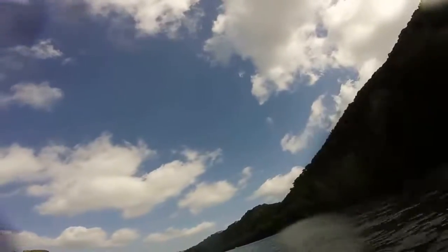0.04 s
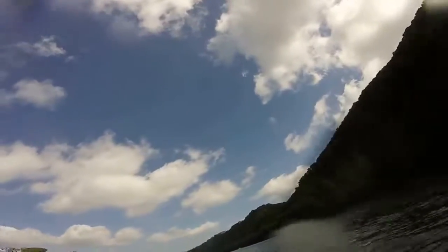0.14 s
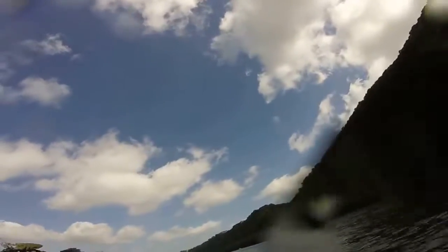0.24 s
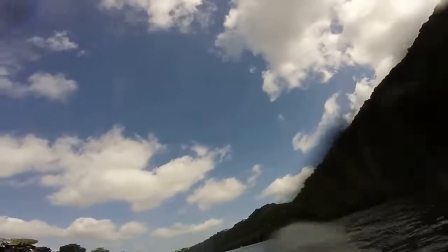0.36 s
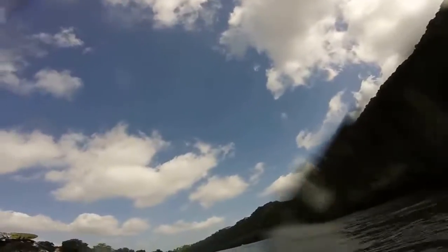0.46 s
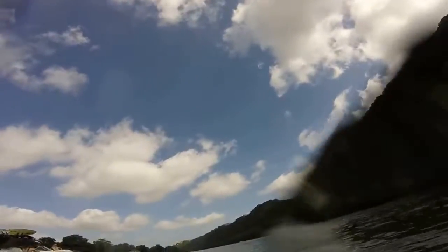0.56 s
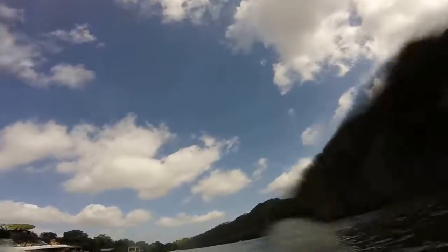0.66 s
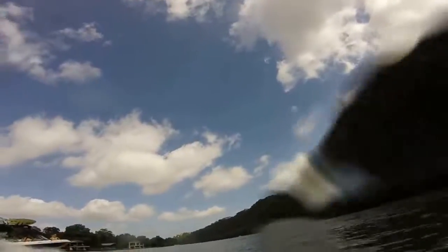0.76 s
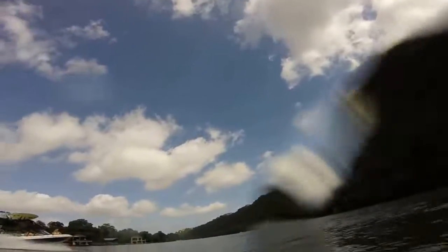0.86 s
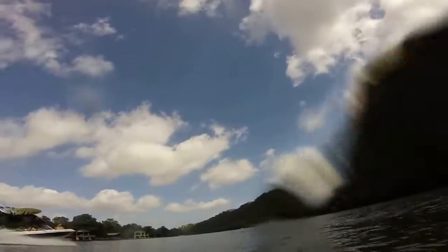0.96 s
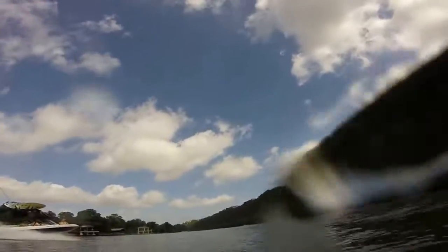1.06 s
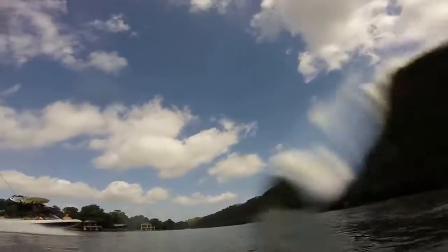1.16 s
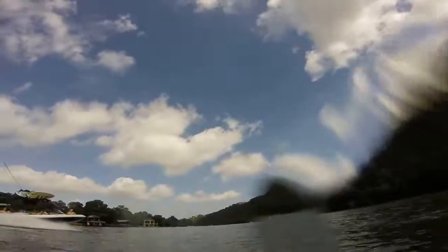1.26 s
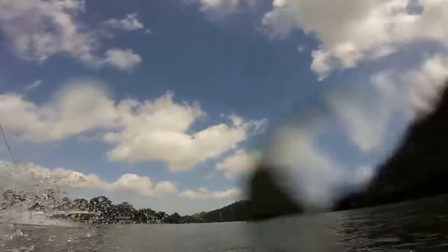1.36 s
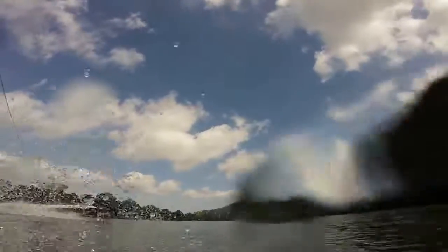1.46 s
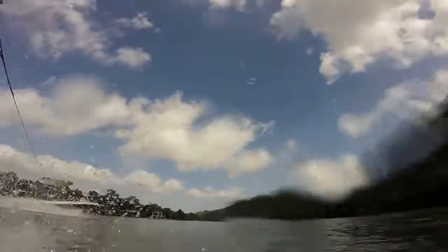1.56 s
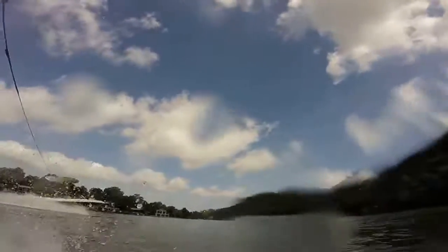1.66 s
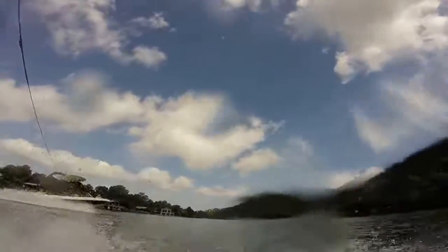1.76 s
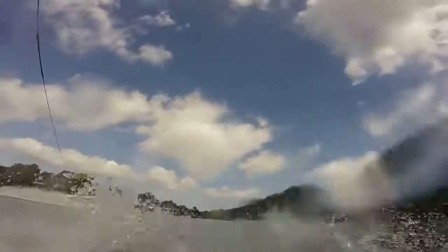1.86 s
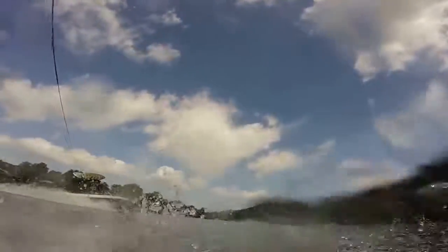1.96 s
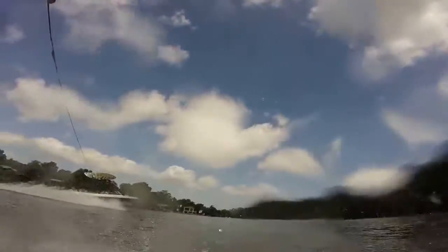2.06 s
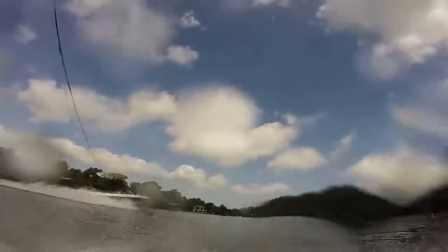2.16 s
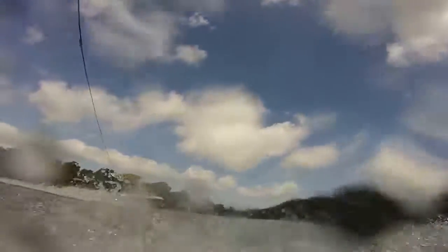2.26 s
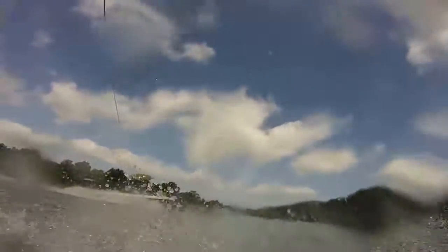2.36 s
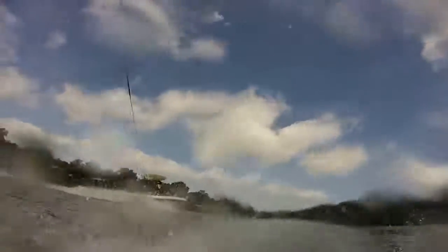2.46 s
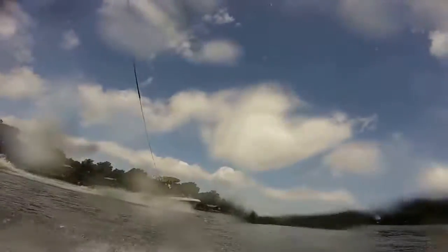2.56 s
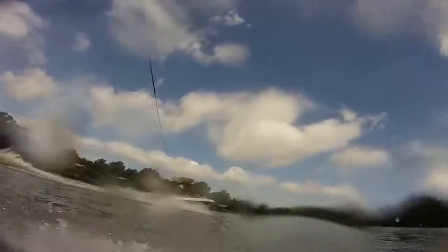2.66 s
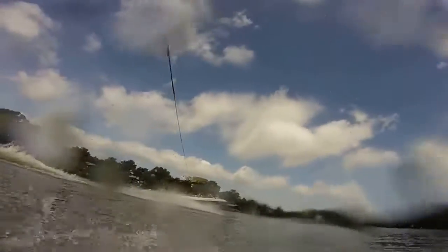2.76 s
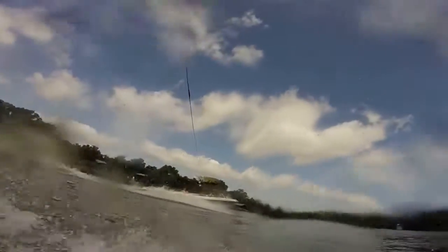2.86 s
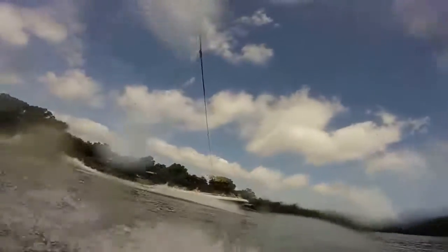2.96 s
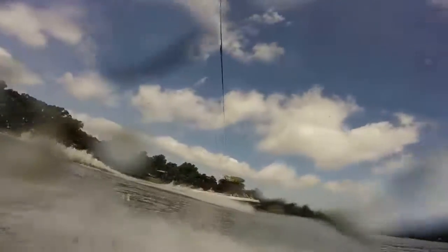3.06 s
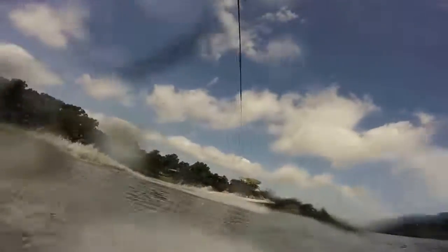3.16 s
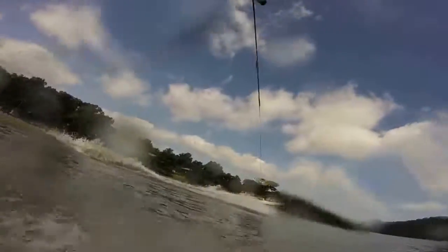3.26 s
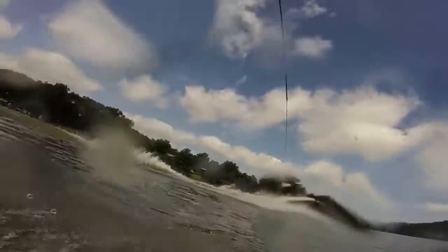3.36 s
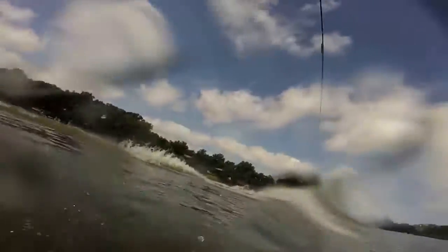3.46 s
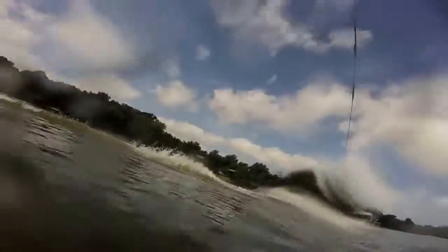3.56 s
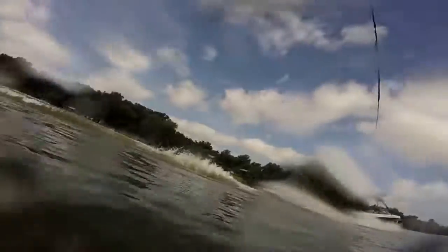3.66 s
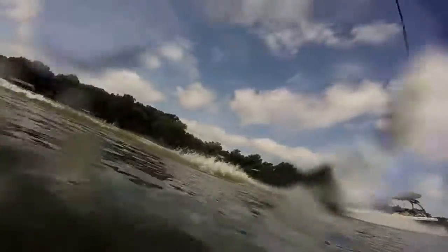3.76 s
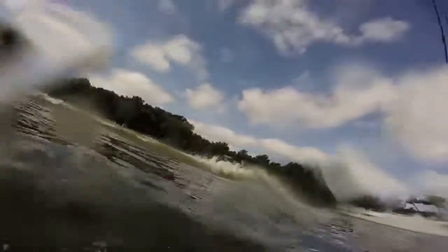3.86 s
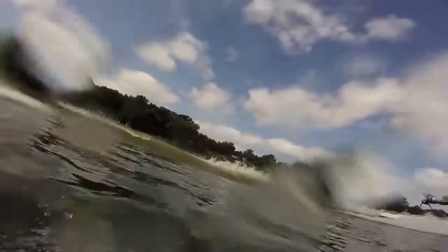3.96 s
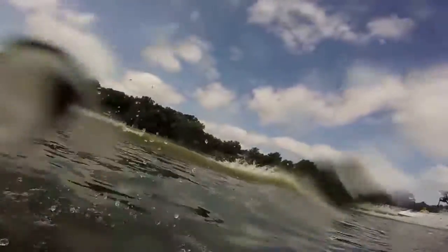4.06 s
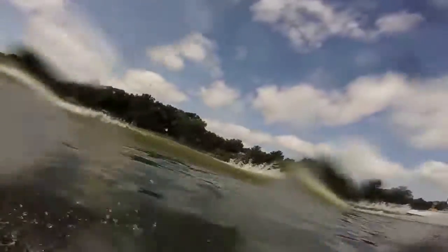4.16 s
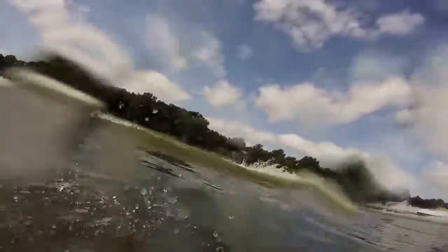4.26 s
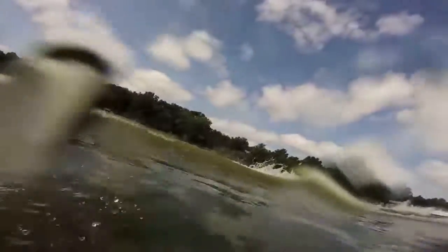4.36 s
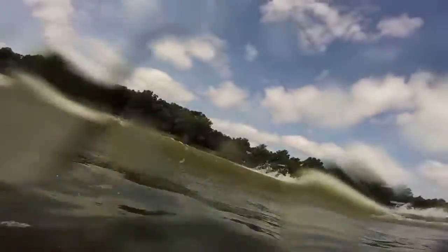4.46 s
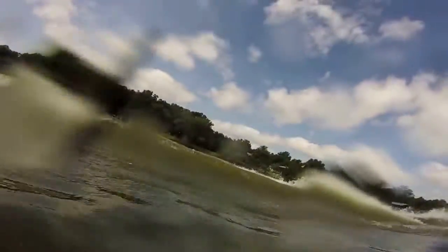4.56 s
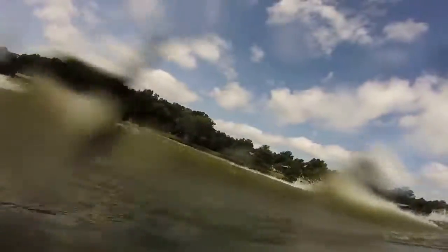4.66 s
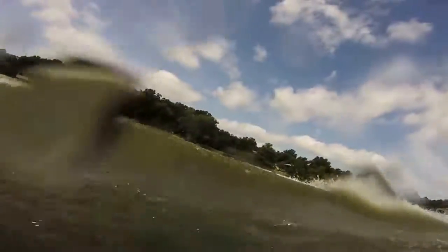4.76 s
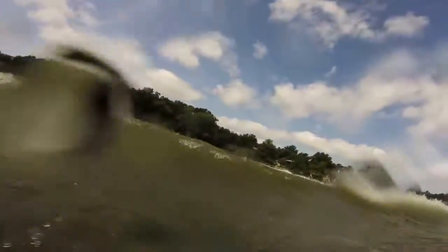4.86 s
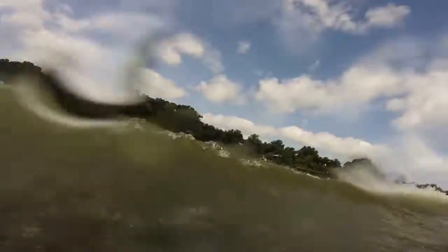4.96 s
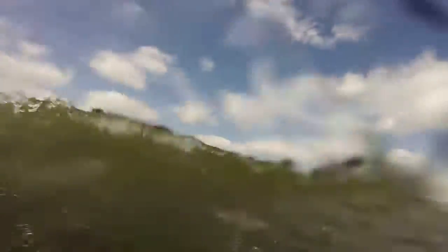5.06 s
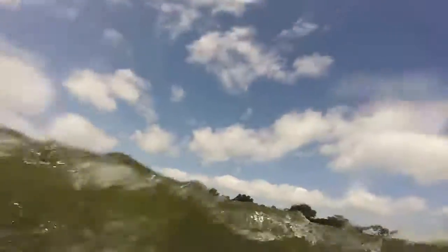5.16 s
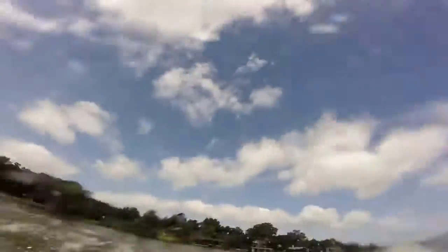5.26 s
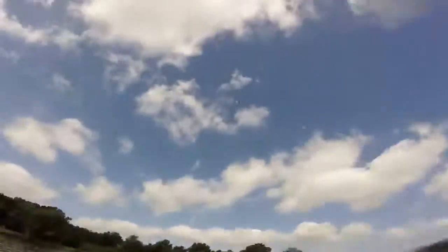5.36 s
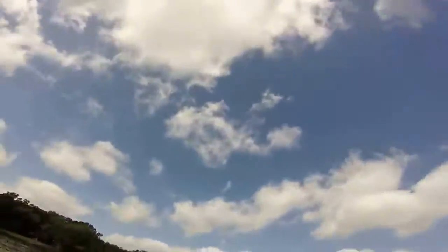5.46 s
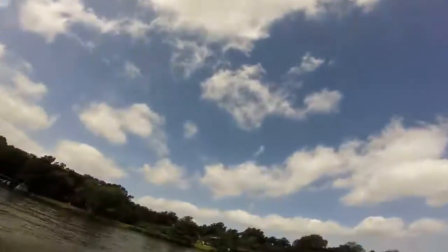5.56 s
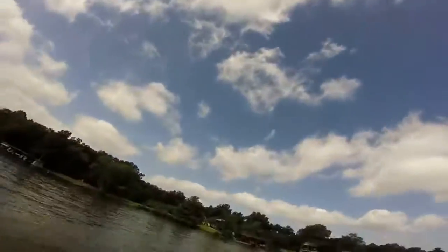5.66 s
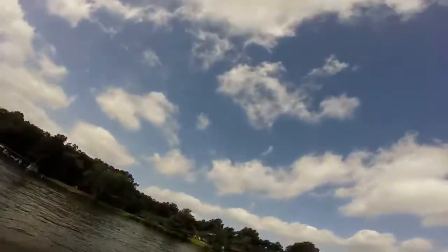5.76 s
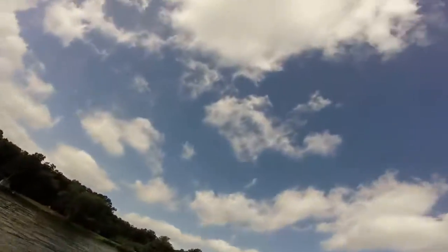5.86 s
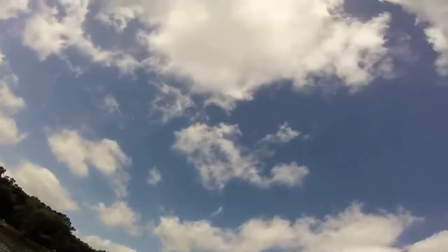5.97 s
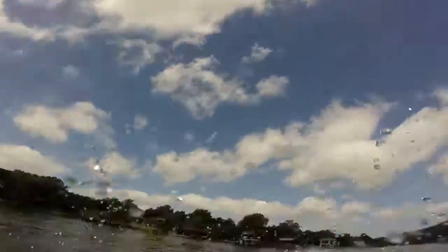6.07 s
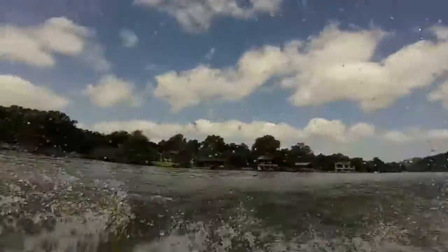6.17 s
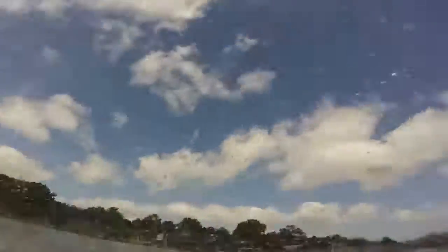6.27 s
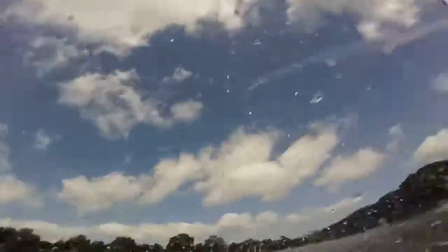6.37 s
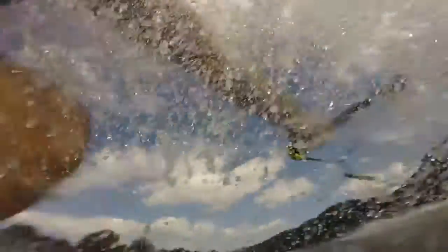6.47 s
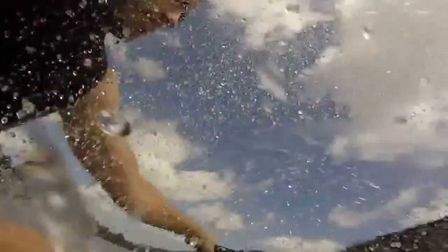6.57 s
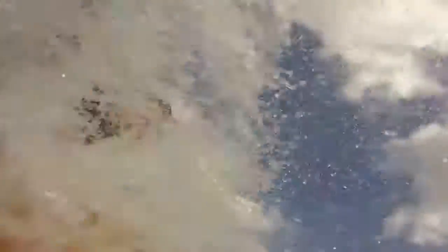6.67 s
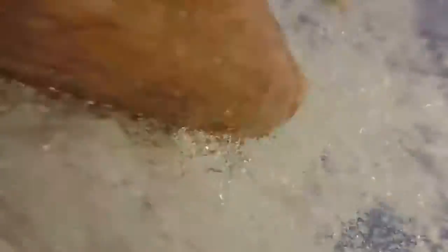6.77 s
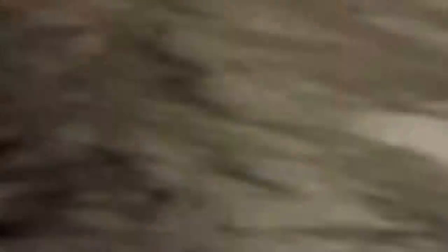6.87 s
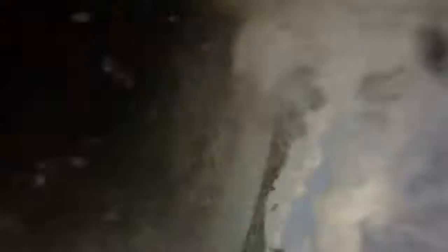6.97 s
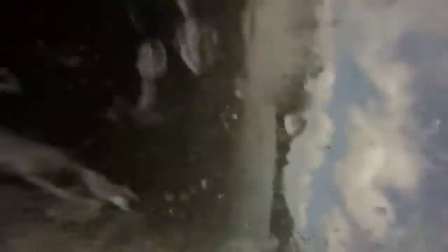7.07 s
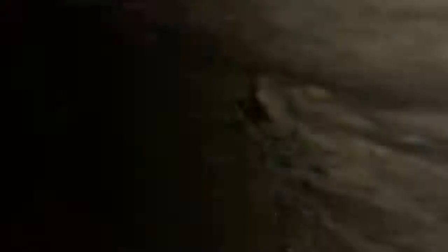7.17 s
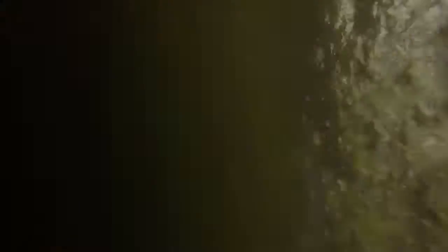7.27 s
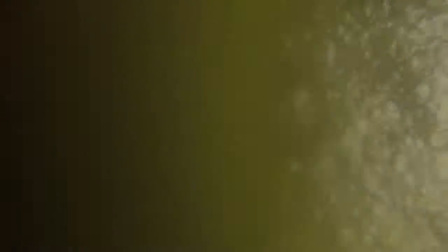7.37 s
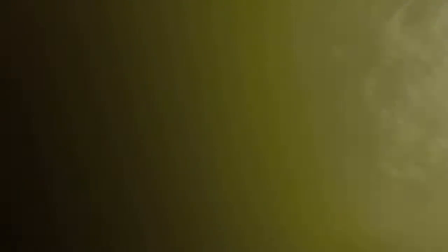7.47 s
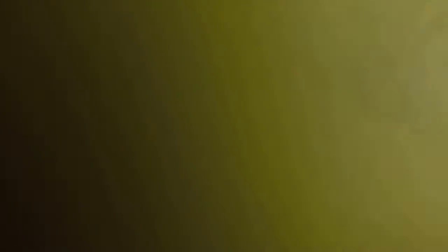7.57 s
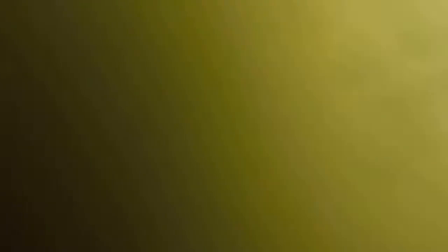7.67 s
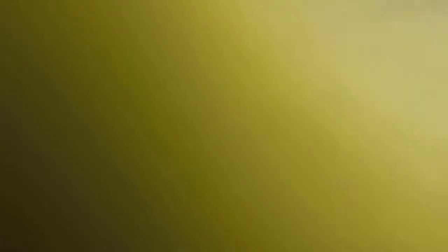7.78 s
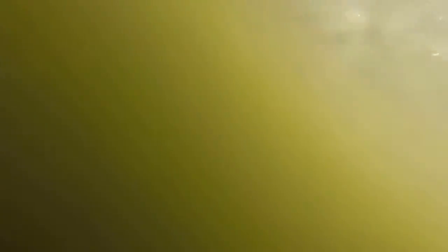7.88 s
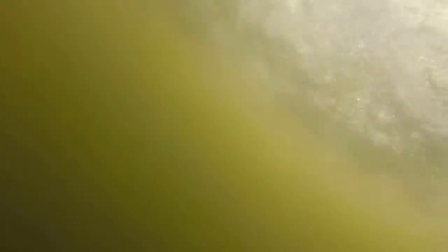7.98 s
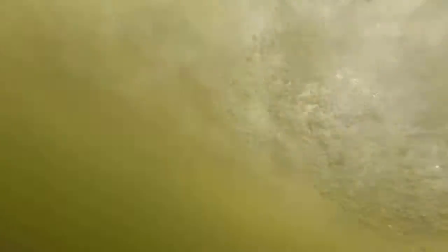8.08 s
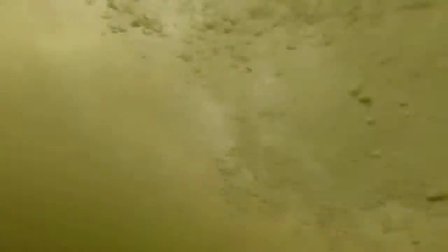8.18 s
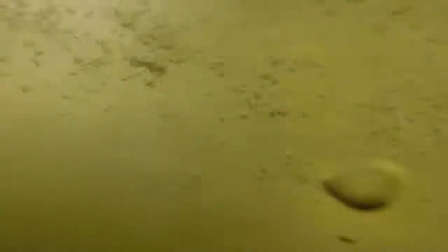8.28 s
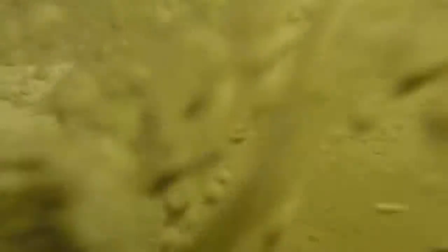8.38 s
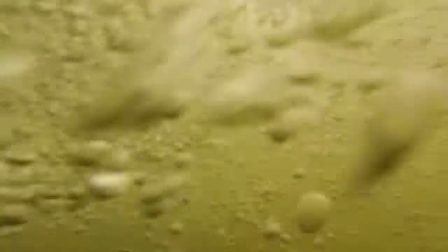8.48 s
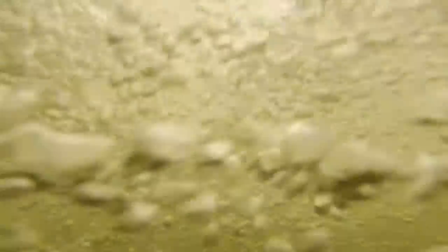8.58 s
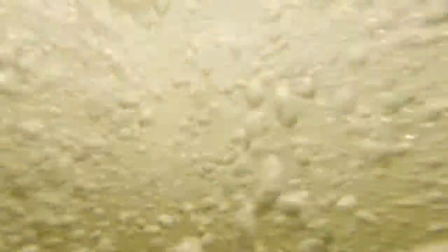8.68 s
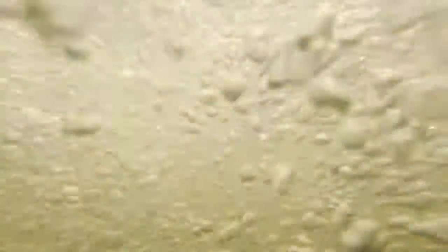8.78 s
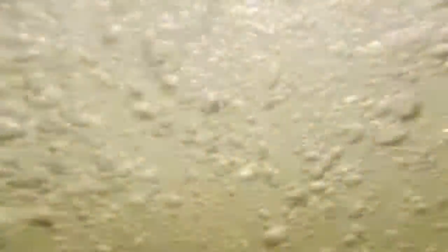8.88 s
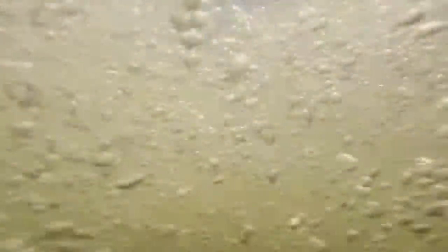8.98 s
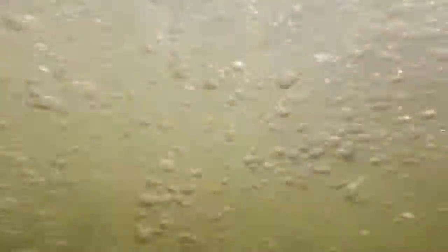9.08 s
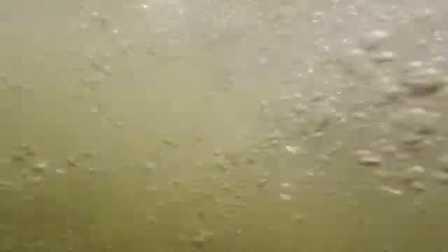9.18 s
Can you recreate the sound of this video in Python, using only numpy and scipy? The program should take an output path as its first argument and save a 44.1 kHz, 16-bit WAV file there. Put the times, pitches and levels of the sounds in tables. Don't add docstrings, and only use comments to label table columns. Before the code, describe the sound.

Wakeboard drums and flexes over choppy water with spray rattling a sealed plastic housing, then a splashing fall and muffled underwater gurgling.

```python
import sys
import numpy as np
from scipy import signal
from scipy.fft import rfft, irfft, next_fast_len
from scipy.io import wavfile
from scipy.ndimage import uniform_filter1d, map_coordinates

SR = 44100
rng = np.random.default_rng(int(sys.argv[2]) if len(sys.argv) > 2 else 0)


def undo_db(level):
    steps = np.asarray(level, float) / 20
    return 10 ** steps


def to_wav(sig):
    pcm = np.clip(np.atleast_2d(sig), -1, 1) * 32767
    pcm = np.round(pcm).astype(np.int16)
    wavfile.write(sys.argv[1], SR, pcm.T)


N = 407043


def unit(x):
    return x / np.sqrt(np.mean(x ** 2) + 1e-20)


def curves(rows):
    s, *columns = np.transpose(rows)
    t = np.arange(N) / SR
    fade = np.clip(1 + np.minimum(t - s[0], s[-1] - t) / 0.25, 0, 1)
    return [np.interp(t, s, column) for column in columns] + [fade]


def held(rows, blend_s):
    out = np.zeros(N)
    for s, value, length_s in rows:
        out[max(int(s * SR), 0):int((s + length_s) * SR)] += value
    return uniform_filter1d(out, int(blend_s * SR) + 1)


def wobble(rate):
    knots = rng.standard_normal(int(N * rate / SR) + 4)
    return map_coordinates(knots, [np.arange(N) * rate / SR])


def shaped(x, spectrum, modes=()):
    size, short = 2 * next_fast_len(N // 2 + SR // 4), 2 ** 14
    hz, db = np.transpose(spectrum)
    log_hz = np.log(np.fft.rfftfreq(short, 1 / SR) + 1)
    cepstrum = irfft(np.log(undo_db(np.interp(log_hz, np.log(hz), db)) + 1e-6), short)
    cepstrum[1:short // 2] *= 2
    cepstrum[short // 2 + 1:] = 0
    gain = rfft(irfft(np.exp(rfft(cepstrum)), short), size)
    f = np.fft.rfftfreq(size, 1 / SR)
    if len(modes):
        response = 0
        for k, (center, width, level_db) in enumerate(modes):
            band = 1j * f * width / (center * center - f * f + 1j * f * width)
            response = response + (-1) ** k * undo_db(level_db) * band
        gain = gain * response
    return irfft(rfft(x, size) * gain, size)[:N]


def evened(x, spectrum):
    return shaped(x, spectrum) / np.std(shaped(rng.standard_normal(N), spectrum))


def pelt(rate, spread_db, share):
    size_db = np.minimum(spread_db * rng.exponential(size=N), 9)
    hits = (rng.random(N) < rate / SR) * undo_db(size_db) * rng.standard_normal(N)
    share = np.clip(share, 0, 1)
    return np.sqrt(share) * unit(hits) + np.sqrt(1 - share) * rng.standard_normal(N)


def rings(rows, rise, attack):
    out, t = np.zeros(N + SR), np.arange(SR // 8) / SR
    for s, db, hz, t60 in rows:
        n = int(min(t60 * 1.2 * SR, len(t)))
        u = t[:n]
        tone = np.sin(2 * np.pi * hz * u * (1 + rise * u / t60))
        envelope = undo_db(db - 60 * u / t60) * (1 - np.exp(-u * hz / attack))
        out[int(s * SR):][:n] += envelope * tone
    return out[:N]


def spatter(rows, t60, width):
    out, t = np.zeros(N + SR), np.arange(SR // 50) / SR
    noise = rng.standard_normal((len(rows), 2, len(t)))
    for (s, db, hz), pair in zip(rows, noise):
        span = int(SR / hz / width) + 1
        a, b = unit(uniform_filter1d(uniform_filter1d(pair, span), span))
        burst = a * np.sin(2 * np.pi * hz * t) + b * np.cos(2 * np.pi * hz * t)
        envelope = undo_db(db - 60 * t / t60) * (1 - np.exp(-t / 0.0003))
        out[max(int(s * SR), 0):][:len(t)] += envelope * burst
    return out[:N]


# pitch_hz, level_db
STIFF = [(20, 0), (450, -8), (600, -14), (1500, -18.5), (4000, -120)]
# pitch_hz, width_hz, level_db
DRUM = [(91.9, 19.7, -2.5), (189, 25.1, 0.5), (217.6, 53.5, -7), (390, 96, -14.5)]


def board_drum(chop, patter):
    blows = undo_db(chop + 2.34 * patter) * pelt(rate=150, spread_db=1.5, share=0.24)
    return unit(shaped(blows, STIFF, DRUM))


# pitch_hz, width_hz, level_db
FLEX = [(31.3, 14.6, -0.5), (69, 36.7, -11)]


def board_flex():
    return unit(shaped(pelt(rate=45, spread_db=4.5, share=0.42), STIFF, FLEX))


# pitch_hz, density_db_per_hz
SEAL = [(300, -9.5), (700, -7), (1100, 2.5), (3200, -2.5), (3700, -15.5), (10000, -34), (15000, -33.5)]
# pitch_hz, width_hz, level_db
HOUSING = [(1324, 300, 3), (1724, 360, -10), (2407, 86, -4), (3040, 176, -12.5), (4070, 320, -13.5),
           (5030, 340, -58.5), (6140, 420, -12), (7140, 690, -50), (8900, 450, -60.5)]


def spray_on_housing(chop, patter):
    gusts = undo_db(0.2 * chop + 2.33 * patter + 2.1 * wobble(110))
    return unit(shaped(gusts * pelt(rate=900, spread_db=-1, share=0.49), SEAL, HOUSING))


# pitch_hz, width_hz, level_db
WALLS = [(1905, 186, 2), (2563, 126, 3), (3120, 310, -2), (4160, 220, -15), (5040, 79, -4),
         (5940, 220, -2.5), (7000, 200, -3.5), (8950, 300, -4.5)]


def thin_walls(chop, patter):
    gusts = undo_db(0.67 * chop + 2.5 * patter + 3 * wobble(90))
    return unit(shaped(gusts * pelt(rate=900, spread_db=6, share=0.45), SEAL, WALLS))


# pitch_hz, density_db_per_hz
FIZZ = [(1180, -10), (2000, -2), (2280, -9), (3080, -3.5), (4020, -15), (5030, -16.5), (5620, -19),
        (8210, -20.5), (14500, -36.5), (15700, -49.5)]
# pitch_hz, density_db_per_hz
CRACK = [(1000, -12), (2000, 2), (3100, 5), (4500, -7.5), (7000, -9.5), (9500, -21), (12000, -47),
         (15700, -56)]


def port_fizz(chop, patter, wet_db):
    fizz = unit(shaped(undo_db(0.34 * chop + 0.64 * patter) * pelt(rate=1700, spread_db=22.5, share=0.43), FIZZ))
    droplets = unit(shaped(pelt(rate=290, spread_db=7.0, share=1) * undo_db(5.4 * wobble(25)), CRACK))
    return fizz + undo_db(-17 + 0.5 * wet_db) * droplets


# start_s, peak_db, pitch_hz
SLAPS = [(1.013, -11, 61.9), (2.18, -7, 59), (2.355, -5.5, 177), (3.464, 2, 35), (4.133, -5, 90),
         (5.013, -6, 189), (5.044, 5, 75), (5.201, -1.5, 71.4), (6.138, 6.5, 156), (6.142, -7, 310),
         (6.295, -7.5, 280), (7.249, -13, 520), (4.123, -17, 387), (6.287, 0, 64.6), (6.308, 6, 75),
         (6.515, -8.5, 130), (6.555, -3, 138), (6.627, -5, 148), (6.914, 0.5, 123), (7.08, -3.5, 77)]


def wave_slaps():
    return rings([(s, db, hz, 0.028) for s, db, hz in SLAPS], rise=-0.088, attack=0.084)


# time_s, contact_db, spray_over_contact_db
RIDE = [(0, -20, -7), (.95, -19, -8.5), (1.3, -23.5, -10), (2.06, -31.5, -13), (2.93, -23, -13),
        (3.3, -20, -7), (3.75, -27.5, -3.5), (4.05, -32, -5), (4.95, -19, -5.5), (5.48, -28, -12),
        (5.62, -35.5, -11.5), (5.9, -57.5, -4.5), (6.4, -29.5, -10.5), (6.55, -24, -13.5),
        (7.15, -28.5, -10.5), (7.42, -32, 8), (7.66, -32, -9.5), (7.9, -33.5, -40)]
# start_s, flex_db, port_fizz_db, wall_rattle_db
STAGES = [(0, -16.5, 2, -16), (2.56, -16, 6, -13), (3.55, -24, 0, -5.5), (4.15, -18.5, 0, -4),
          (5.06, -16, -3.5, -32), (5.66, -36.5, -2.5, -1.5), (6.14, -24.5, -2, -5.5), (6.44, -22, 8.5, 3.5),
          (7.2, -29, 14, -4), (7.65, -28, 5, -6), (7.76, -37.5, 0, -13.5)]
# start_s,
# change_db, length_s
CRESTS = [(.22, 5, 0.089), (.42, -3.5, 0.2), (.9, 2, 0.015), (2.72, 4.5, 0.13), (1.27, 5, 0.013),
          (1.44, 10.5, 0.038), (1.51, 9, 0.048), (1.605, 8.5, 0.02), (1.9, 9, 0.13), (2.04, -5.5, 0.063),
          (2.18, 10.5, 0.023), (2.34, 7.5, 0.092), (3.38, 4, 0.1), (3.58, 4, 0.051), (3.84, 5, 0.11),
          (4.05, -8.5, 0.045), (4.11, 5, 0.091), (4.34, 6, 0.087), (5.0, 7, 0.042), (5.22, -12, 0.058),
          (5.9, 6, 0.14), (5.95, 6, 0.062), (6.215, -5, 0.038), (6.28, 17.5, 0.026), (6.34, -9.5, 0.087),
          (7.04, -2.5, 0.034), (3.947, -4, 0.024), (5.67, -9, 0.13), (7.23, 2.5, 0.084)]


def board():
    contact_db, over_db, fade = curves(RIDE)
    starts, *levels = np.transpose(STAGES)
    lengths = np.diff(starts, append=N / SR)
    flex_db, wet_db, walls_db = (held(zip(starts, v, lengths), blend_s=0.012) for v in levels)
    crest_db = held(CRESTS, blend_s=0.0081)
    drum_db = contact_db + 1.02 * crest_db
    spray_db = contact_db + over_db + crest_db
    fizz_db = -49 + 0.37 * (spray_db + 26) + wet_db
    chop, patter = wobble(22), wobble(50)
    drum = undo_db(drum_db + 2) * board_drum(chop, patter)
    flex = undo_db(flex_db + 0.66 * crest_db) * board_flex()
    rattle = spray_on_housing(chop, patter) + undo_db(walls_db) * thin_walls(chop, patter)
    fizz = undo_db(fizz_db) * port_fizz(chop, patter, wet_db)
    steady = drum + undo_db(spray_db + 0.5) * rattle + fizz
    return flex + fade * steady + undo_db(2) * wave_slaps()


# start_s, peak_db, pitch_hz
KNOCKS = [(3.405, -16, 1370), (3.598, -4, 1220), (3.7423, -11, 1600), (3.8527, -1.5, 1290),
          (3.8778, -0.5, 1310), (3.9162, -6.5, 1240), (4.132, -8.5, 1410), (4.5294, -6, 1230),
          (4.64, -9.5, 1290), (4.701, -10, 1450), (4.812, -7.5, 1660), (4.905, -7.5, 1250),
          (4.9304, -6, 1260), (5.0147, -16, 1200), (5.062, -7, 1300), (5.205, -12, 1250),
          (6.1381, 2.5, 1460), (1.618, -15, 1350), (6.397, -21, 1580), (6.594, -8.5, 1650),
          (7.0258, -14, 1530)]
# start_s, peak_db, crack_over_knock_db
SPITS = [(3.811, -24, -30), (3.842, 3.5, -16.5), (3.939, 6, -25.5), (5.132, 7, -14.5), (6.2985, -23, -11),
         (5.255, -10.5, -5.5), (5.3029, 4.5, -32), (5.6407, -7.5, 2.5), (5.658, -31, -8),
         (6.1534, -6.5, -12), (6.1772, -11.5, -5), (6.1874, -13.5, -0.5), (6.1959, -7, -7.5),
         (6.352, -28, 12), (6.3683, -26, 2), (6.4448, -4, -12), (6.4629, -19, -21), (6.4861, -7.5, -13),
         (6.5032, -1, -3.5), (6.543, -0.5, -14.5), (6.577, -17.5, 2), (6.6562, -4, 1), (6.694, -14.5, -12),
         (6.7294, -32, -5), (6.7344, -2, -17.5), (6.746, -33, -13), (6.912, -2.5, -13), (6.975, -11, 11.5),
         (7.129, -19, -11), (7.2535, 7, -11)]


def knocks():
    dull, bright, t = np.zeros(N + SR), np.zeros(N + SR), np.arange(SR // 20) / SR
    blobs = [(s, db - 5, -50) for s, db, _ in KNOCKS]
    for s, db, crack_db in blobs + SPITS:
        t60 = 0.012 * np.exp(0.15 * rng.standard_normal())
        envelope = undo_db(db - 60 * t / t60) * (1 - np.exp(-t / 0.00043))
        burst = envelope * rng.standard_normal((2, len(t)))
        dull[int(s * SR):][:len(t)] += burst[0]
        bright[int(s * SR):][:len(t)] += burst[1] * undo_db(crack_db - 60 * t / 0.015)
    struck = [(hz, 0.86 * width, db * 0.17) for hz, width, db in HOUSING]
    return undo_db(7) * shaped(dull[:N], SEAL, struck) + undo_db(6.5) * evened(bright[:N], CRACK)


def blob_plops():
    return rings([(s, db + 4, hz, 0.02) for s, db, hz in KNOCKS], rise=0.054, attack=2.8)


# pitch_hz, level_db, t60_s
PINGS = [(2890, 2, 0.012), (3190, -5, 0.016), (4050, -8, 0.012)]
# start_s, peak_db, pitch_hz, t60_s
CLEAN = [(3.8715, -2, 1290, 0.017), (3.89, -10, 1560, .024), (5.6406, 5, 2976, 0.01), ]


def wall_pings():
    detune = np.exp(0.014 * rng.standard_normal(len(SPITS)))
    pings = []
    for (s, db, crack_db), off in zip(SPITS, detune):
        for hz, mode_db, t60 in PINGS:
            pings.append((s, db + 0.5 * crack_db - 3.5 + mode_db, hz * off, t60))
    return rings(pings + CLEAN, rise=0.011, attack=0.65)


# start_s, peak_db, length_s
SHEETS = [(5.328, -38, 0.02), (5.3513, -18, 0.0053), (5.366, -30, 0.0095), (6.192, -28, 0.0062),
          (6.294, -36, 0.01), (6.513, -31, 0.02), (6.698, -29, 0.004), (6.837, -32, 0.02),
          (6.68, -35.5, 0.004), (6.803, -18, 0.021), (6.89, -27.5, 0.023), (6.9113, -18, 0.025),
          (6.988, -22, 0.033), (6.942, -19.5, 0.033), (7.2335, -20.5, 0.022), (7.265, -23, 0.035),
          (7.314, -29.5, 0.043), (7.035, -44, 0.03)]


def water_sheets():
    wash = held([(s, undo_db(db), length_s + 0.0055) for s, db, length_s in SHEETS], blend_s=0.002)
    keep = np.exp(-1 / (0.0028 * SR))
    wash = np.maximum(wash, signal.lfilter([1 - keep], [1, -keep], wash))
    return evened(wash * undo_db(-9.5) * pelt(rate=2900, spread_db=17.0, share=0.85), FIZZ)


# start_s, peak_db, pitch_hz
SPECKS = [(1.949, -46, 6630), (2.029, -46, 5940), (2.195, -48, 5210), (2.416, -46, 5500),
          (3.733, -44, 10000), (3.733, -38, 3960), (3.8415, -18.5, 4040), (3.9392, -30.5, 6880),
          (4.1895, -43, 7600), (4.278, -41, 7160), (4.361, -48, 7200), (4.7, -43.5, 4601), (3.8, -42, 5120),
          (5.2062, -43, 3600), (5.237, -46, 3500), (4.6, -39, 3830), (5.3508, -32, 4270), (6, -41, 4570),
          (5.5504, -46, 3830), (5.5873, -38.5, 3300), (5.6407, -17, 1400), (5.6407, -28, 9440),
          (5.6407, -38, 13960), (5.6595, -49, 11200), (6.8, -31, 4740), (6.8, -39.5, 6630),
          (5.5, -47, 5100),
          (6.3971, -44, 4010), (6.4573, -38, 5210), (6.462, -36, 5210), (6.4683, -41, 8740),
           (6.47, -37, 4260), (6.593, -48, 11760), (6.596, -32, 5100), (6.6494, -47, 9200),
           (6.6662, -35, 4260), (6.6923, -48, 6290), (6.7068, -52, 11710), (6.7282, -27.5, 6200),
           (6.743, -34, 5650), (6.802, -27, 8800), (6.811, -25, 7450), (6.8285, -41, 4950),
           (6.888, -35, 6890), (6.8913, -40, 12320), (6.9073, -25, 7600), (6.9193, -39.5, 12490),
           (6.9203, -28, 7280), (6.9302, -29.5, 5940), (6.942, -23, 6530), (6.9417, -39, 11000),
           (7.001, -37, 8740), (7.0165, -40, 6630), (7.0272, -31.5, 4310), (7.1282, -46, 8500),
           (7.1607, -57.5, 12790), (7.1652, -41, 7710), (7.2338, -40, 10720), (7.242, -24, 6230),
           (7.244, -30, 13000), (7.2979, -37, 4610), (7.3215, -43, 8960), (7.3478, -36.5, 6120),
           (7.3533, -37, 4910), (7.3724, -26, 4050), (7.4007, -43, 9260), (7.4414, -35, 4840)]


def drops():
    droplets = spatter(SPECKS, t60=0.01, width=0.6)
    return knocks() + wall_pings() + undo_db(6.5) * water_sheets() + blob_plops() + undo_db(5) * droplets


# time_s, gurgle_db, froth_db
DIVE = [(7.4, -38, -38.5), (7.592, -16.5, -25.5), (7.72, -29.5, -30.5), (7.78, -25.5, -41), (7.9, -29, -40),
        (8.2, -18.5, -50), (8.33, -15.5, -42.5), (8.39, -15, -32.5), (8.572, -19, -26.5),
        (8.98, -17.5, -32.5), (9.04, -18, -44), (9.23, -20.5, -46)]


def cloud(count, low_hz, high_hz, cycles, spread_db, attack, skew=1):
    draw = rng.random((count, 4))
    s = DIVE[0][0] + draw[:, 0] * (DIVE[-1][0] - DIVE[0][0])
    at = (s * SR).astype(int).clip(0, N - 1)
    hz = low_hz[at] + (high_hz[at] - low_hz[at]) * draw[:, 1] ** skew
    db = spread_db * np.sqrt(-np.log(draw[:, 2]))
    t60 = cycles * (0.86 + draw[:, 3]) / hz
    x = rings(np.transpose([s, db, hz, t60]), rise=0.12, attack=attack)
    return x / np.sqrt(np.abs(uniform_filter1d(x ** 2, SR // 6)) + 1e-3)


# pitch_hz, level_db
MUFFLE = [(50, -7.5), (800, 1.5), (1050, -7.5), (1600, -27), (3000, -47)]


def gurgle():
    age_s = np.clip(np.arange(N) / SR - DIVE[0][0], 0, None)
    low_hz = 98 + 132 * np.clip(age_s - 1.5, 0, None)
    high_hz = 834 - (834 - 250) * np.exp(-(age_s / 0.477) ** 1.43)
    bubbling = cloud(1200, low_hz, high_hz, cycles=24, spread_db=6.5, attack=0.6, skew=1.3)
    return shaped(bubbling, MUFFLE)


# pitch_hz, density_db_per_hz
FROTH = [(530, 8), (900, 6), (1040, 2), (1770, 3), (2170, -1.5), (2390, 1), (3390, -11), (4600, -30.5),
         (5280, -41), (6000, -37), (7800, -48), (13200, -120)]


def froth(seethe, fade):
    beads = cloud(650, np.full(N, 900), np.full(N, 5200), cycles=18, spread_db=7, attack=1.2)
    fizz = unit(undo_db(3.5 * seethe) * pelt(rate=900, spread_db=6, share=0.25))
    return unit(shaped(beads + undo_db(6) * fizz, FROTH) * fade)


# pitch_hz, density_db_per_hz
FINE = [(2060, -57.5), (3500, 8), (4760, 2), (5360, -21), (5890, -15), (9080, -17.5), (13400, -42),
        (15700, -40)]


def fine_bubbles(seethe):
    pops = cloud(500, np.full(N, 3000), np.full(N, 10000), cycles=20, spread_db=8, attack=1.5, skew=2.2)
    crackle = unit(shaped(undo_db(4 * seethe) * pelt(rate=450, spread_db=5, share=0.6), FINE))
    return undo_db(-60) * crackle + undo_db(-54.5) * pops


# start_s, peak_db, pitch_hz
GLUGS = [(7.461, -5, 142), (7.489, 2.5, 135), (7.562, -8, 129), (7.586, 0, 166), (7.618, -11, 300),
         (7.639, -5, 365), (7.724, -4, 293), (7.748, -3, 250), (7.797, -11.5, 408), (8.143, -15, 563),
         (8.202, -16, 78.4), (8.272, -5.5, 493), (8.552, -4, 80.7), (8.69, -7, 71.4), (8.309, -7, 580),
         (8.367, -0.5, 87), (8.405, -10, 704), (8.437, -5, 163), (8.478, -1.5, 138), (8.601, -12.5, 250),
         (8.712, -5.5, 250), (8.881, -9, 340), (9.04, -6.5, 393), (9.187, -8, 636)]


def glugs():
    return rings([(s, db, hz, 0.084) for s, db, hz in GLUGS], rise=0.22, attack=0.24)


# start_s, peak_db, pitch_hz
PLINKS = [(7.507, -23, 2840), (7.5349, -21, 2890), (7.5366, -18, 1880), (7.5608, -17, 2950),
          (7.565, -31, 1190), (7.5868, -22, 2280), (7.5927, -31, 1460), (7.6255, -13, 3180),
          (7.632, -25, 1790), (7.663, -25, 4300), (7.6757, -20, 2110), (7.676, -24, 1190),
          (7.687, -22, 1180), (7.7458, -26.5, 1540), (7.7953, -24, 1500), (7.7963, -22, 2740),
          (7.8278, -21, 2620), (7.8466, -19, 3960), (7.8911, -24.5, 1450), (7.982, -35, 2750),
          (8.168, -35, 2000), (8.267, -34, 2370), (8.3791, -20, 2540), (8.4204, -24, 1490),
          (8.4363, -19.5, 1970), (8.471, -12.5, 2310), (8.494, -29, 2630), (8.4948, -19.5, 1200),
          (8.5314, -16, 2410), (8.5511, -12.5, 1360), (8.572, -16, 3870), (8.6056, -28, 3860),
          (8.6129, -23, 2140), (8.614, -23, 1180), (8.6266, -20, 1680), (8.6343, -15.5, 2930),
          (8.652, -12.5, 2320), (8.657, -22, 1270), (8.6704, -15, 2130), (8.682, -19, 2300),
          (8.7082, -32, 4200), (8.736, -21, 1850), (8.7384, -19.5, 2920), (8.7521, -39, 1300),
          (8.7664, -26, 1940), (8.803, -16.5, 1640), (8.806, -16, 2580), (8.813, -21.5, 3950),
          (8.8285, -28, 4050), (8.8528, -20, 3040), (8.8551, -17.5, 1710), (8.8758, -15, 1810),
          (8.904, -21, 3000), (8.9304, -14.5, 1850), (8.9303, -13.5, 2600), (8.948, -22, 3010),
          (8.9562, -16.5, 1530), (8.983, -23, 1900), (8.9978, -17, 2340)]


def plinks():
    tones = rings([(s, db, hz, 32 / hz) for s, db, hz in PLINKS], rise=0.08, attack=0.9)
    return undo_db(4.5) * tones + undo_db(-5.5) * spatter(PLINKS, t60=0.02, width=0.81)


# start_s, peak_db, pitch_hz
TICKS = [(7.4556, -37, 5040), (7.4745, -29.5, 7670), (7.507, -28, 6000), (7.5134, -35.5, 6130),
         (7.5364, -35.5, 5040), (7.557, -30.5, 6740), (7.5678, -29, 5720), (7.5888, -24.5, 6800),
         (7.597, -29, 4350), (7.6027, -36, 10500), (7.6124, -34, 5990), (7.6217, -36, 5050),
         (7.6272, -36, 4340), (7.664, -29, 4390), (7.696, -37, 7710), (7.7249, -35, 4440),
         (7.7379, -39, 5180), (7.8293, -39.5, 4310), (7.8472, -33.5, 4200), (7.8794, -27.5, 6070),
         (8.382, -36.5, 5100), (8.4, -39.5, 9120), (8.455, -43, 5810), (8.4633, -41, 4900),
         (8.4637, -34, 8940), (8.515, -40.5, 8580), (8.5275, -38, 7970), (8.558, -42, 4300),
         (8.5665, -30, 7850), (8.574, -45, 10720), (8.5735, -18, 4720), (8.589, -34, 5940),
         (8.6092, -30, 4310), (8.6193, -38.5, 8480), (8.6186, -41, 11760), (8.625, -26.5, 8900),
         (8.6324, -36, 6380), (8.6643, -27, 4320), (8.71, -35, 4310), (8.7546, -35, 4240),
         (8.7805, -35, 4230), (8.792, -34, 4280), (8.804, -28.5, 9100), (8.8082, -31, 5040),
         (8.8206, -43, 9620), (8.8294, -27, 4120), (8.8534, -35, 4250), (8.8627, -39, 4730),
         (8.9043, -44, 4300), (8.9276, -35, 8480), (8.9363, -27, 7600), (8.9464, -41, 4260),
         (8.948, -37, 8700), (8.9576, -45, 12360), (8.9833, -36, 6620), (8.9973, -38, 4290),
         (8.9979, -30.5, 7950)]


def ticks():
    tones = rings([(s, db, hz, 36 / hz) for s, db, hz in TICKS], rise=0.022, attack=2.3)
    return tones + undo_db(-4) * spatter(TICKS, t60=0.0071, width=0.55)


def bubbles():
    gurgle_db, froth_db, fade = curves(DIVE)
    seethe = wobble(40)
    small = undo_db(0.94 * (froth_db + 31)) * fine_bubbles(seethe)
    steady = undo_db(gurgle_db + 1) * gurgle() + undo_db(froth_db - 4) * froth(seethe, fade) + small
    return fade * steady + undo_db(-2.5) * glugs() + plinks() + undo_db(7.5) * ticks()


# pitch_hz, density_db_per_hz
HISS = [(290, -51), (500, -1.5), (929, -15.5), (1410, 2.5), (2480, -7), (3820, -32.5), (11000, -27.5),
        (15700, -57)]


def background_hiss():
    return undo_db(-58.5) * unit(shaped(rng.standard_normal(N), HISS))


def scene():
    return (board() + drops() + bubbles() + background_hiss())[None]


def top_cut(x):
    return signal.sosfilt(signal.butter(12, 15820, fs=SR, output="sos"), x)


def record(dry):
    clipped = dry / (1 + np.abs(dry / 1.2) ** 8) ** (1 / 8)
    clipped[0] = shaped(clipped[0], [(10, -20), (20, 0), (15700, 0), (16100, -70)])
    return top_cut(clipped)


dry = scene()
out = record(dry)
to_wav(out)
```